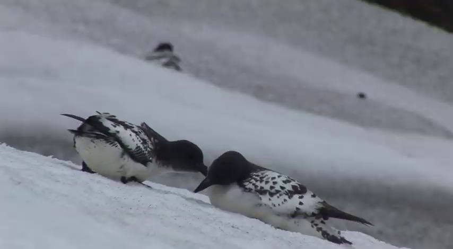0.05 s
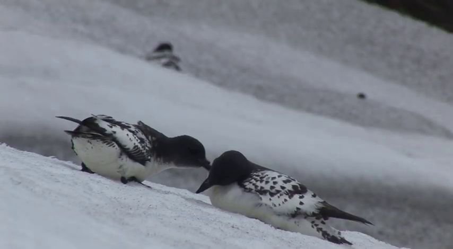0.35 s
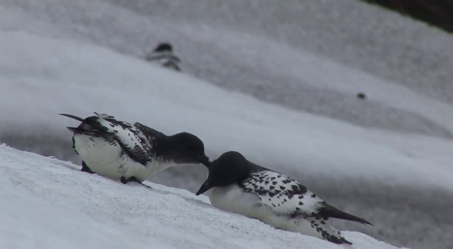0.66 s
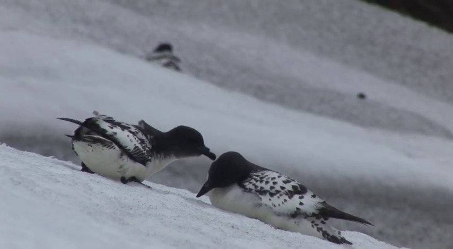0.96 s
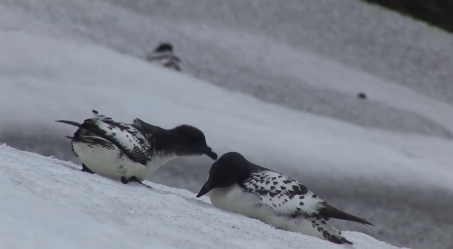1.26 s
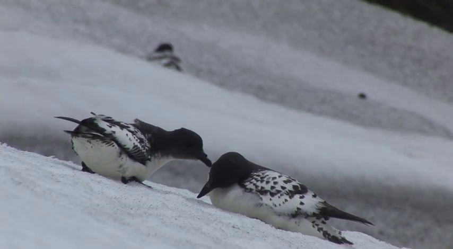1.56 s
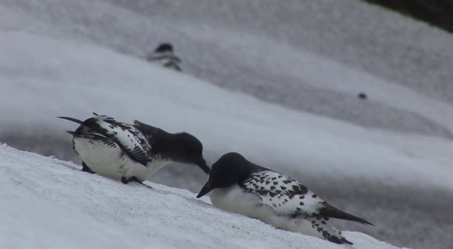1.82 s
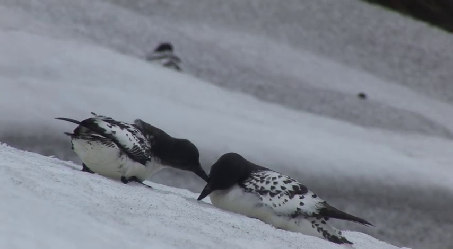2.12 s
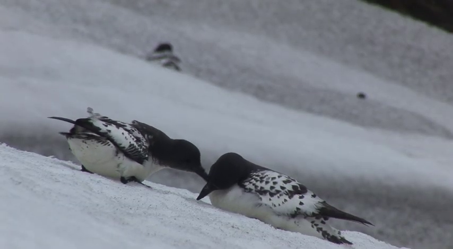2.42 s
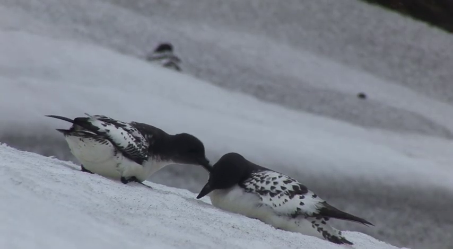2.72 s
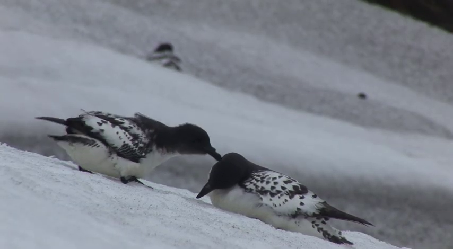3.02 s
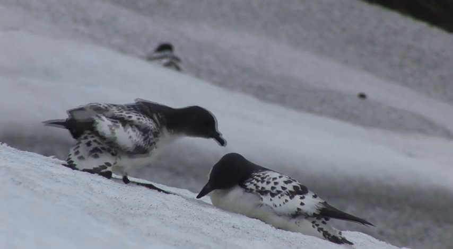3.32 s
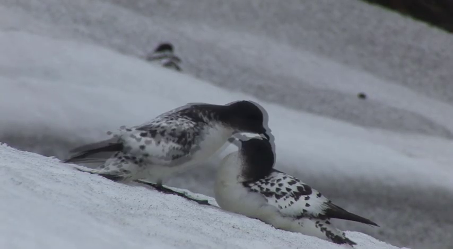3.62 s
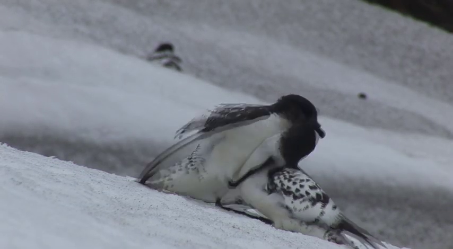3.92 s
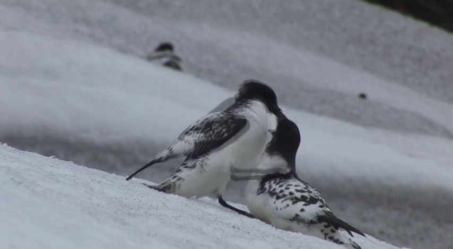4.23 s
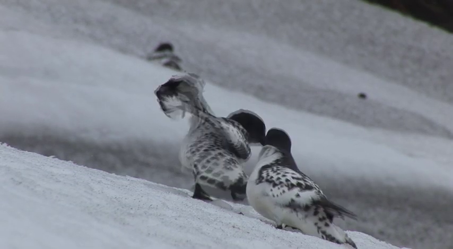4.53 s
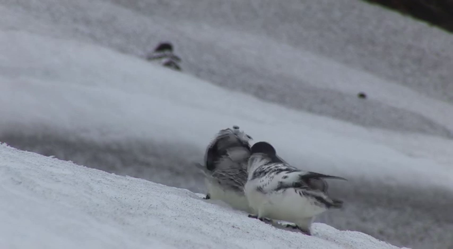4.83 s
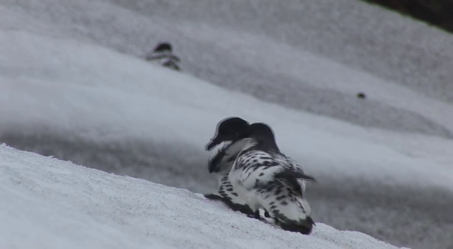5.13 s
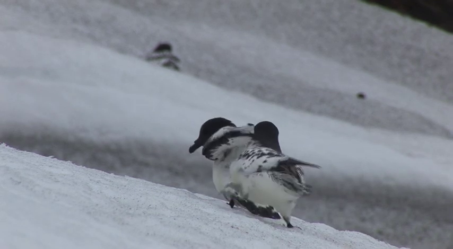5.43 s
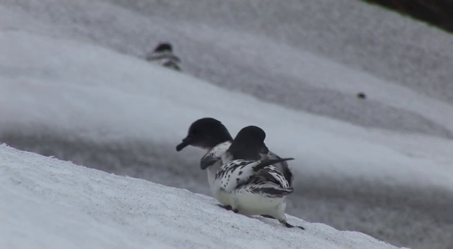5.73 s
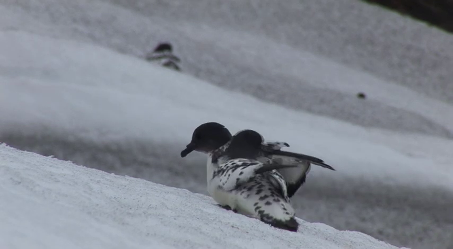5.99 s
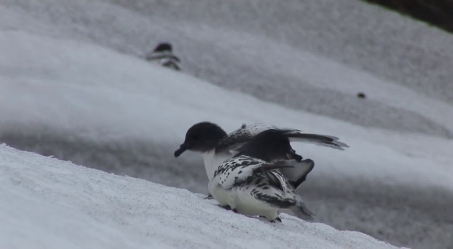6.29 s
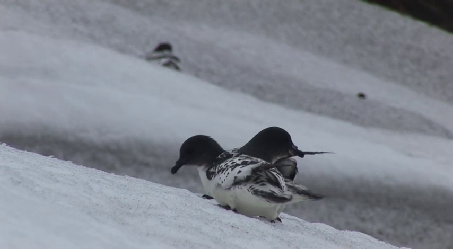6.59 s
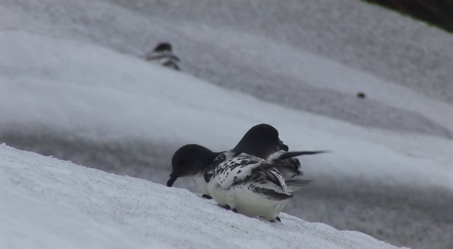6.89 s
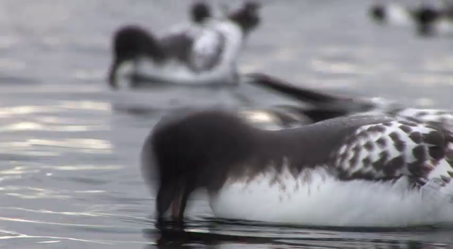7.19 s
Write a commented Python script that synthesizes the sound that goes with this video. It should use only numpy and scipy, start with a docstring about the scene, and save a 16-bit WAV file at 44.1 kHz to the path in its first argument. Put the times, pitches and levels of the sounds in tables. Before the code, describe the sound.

Seabirds quarrel in the open air over a soft wash of shore and faraway birds. Quick, fading pips and dull croaks give way to a nasal cackle, with a few faint ticks. Things quieten briefly before a loud, raspy burst of squeals close to the microphone. Then come hoarse whines, short barks, a dull wing puff, squawks, yelps and another cackle, while low gusts rumble on the microphone.

```python
"""Seabirds squabbling on a snow slope

One bird pips rapidly and slows into a nasal cackle; a close one bursts into shrill squeals, then
whines, barks, squawks and yelps follow. The calls are syrinx pulses and breath shaped by a throat;
the squeals add a whistle. The slope returns a faint echo. Underneath lies the wash of the colony
and the shore, and later on wind buffets the microphone."""
import sys
import numpy as np
from scipy import signal
from scipy.fft import rfft, irfft, next_fast_len
from scipy.io import wavfile
from scipy.ndimage import uniform_filter1d, minimum_filter1d, map_coordinates

SR = 44100
rng = np.random.default_rng(int(sys.argv[2]) if len(sys.argv) > 2 else 0)


def log_audio(samples):
    """Write samples as a 16-bit WAV file to the path given in sys.argv[1]."""
    # one column per channel
    frames = np.atleast_2d(samples).T
    # limit to full scale, then quantise
    limited = np.clip(frames, -1, 1)
    pcm = np.round(limited * 32767).astype(np.int16)
    wavfile.write(sys.argv[1], SR, pcm)


N = 324135

TOP_HZ = 15800  # band limit
USUAL_HZ = 543.4  # notes above this pitch are pressed harder

# close squeals: (time [s], length [s], whistle [dB], 2nd harmonic [dB], 3rd harmonic [dB],
# buzz pitch [Hz], buzz [dB], handover from buzz to whistle [share of the note])
SQUEALS = [(3.997, 0.015, -28, -40, -25.5, 682, -19.5, 0.7), (4.04, 0.016, -25, -14, -38, 719, -11.5, 0.78),
           (4.084, 0.016, -23.5, -19.5, -41, 736, -13.5, 0.58),
           (4.125, 0.021, -21, -12, -32.5, 615, -17.5, 0.12), (4.171, 0.019, -25, -23, -33, 713, -12, 0.74),
           (4.211, 0.022, -21.5, -13, -27.5, 705, -17, 0.14),
           (4.255, 0.019, -18, -13.5, -28, 712, -24.5, 0.078),
           (4.296, 0.024, -31, -61, -51, 694, -8.5, 0.26),
           (4.337, 0.029, -18.5, -23, -21.5, 706, -21, 0.061),
           (4.382, 0.041, -20, -18.5, -39, 717, -18.5, 0.092)]
# the whistle sinks through the burst: (time [s], pitch [Hz])
WHISTLE_PITCH = [(4.04, 2220), (4.26, 2178), (4.33, 2047)]
# dry rasps: (time [s], length [s], start pitch [Hz], end pitch [Hz], level [dB], beak ring [dB],
# fade-out [share of the note])
RASPS = [(3.938, 0.0304, 454, 610, -16, 15, 0.45), (4.418, 0.053, 760, 607, -14.5, -4, 0.91)]
# short pips: (centre [s], nominal length [s])
PIPS = [(0.0395, 0.016), (0.089, 0.018), (0.134, 0.015), (0.176, 0.0071), (0.231, 0.012), (.277, 0.0068),
        (0.329, 0.006), (0.383, 0.0083), (0.4412, 0.0062), (0.497, 0.0054), (0.553, 0.0028), (.58, 0.0059),
        (0.613, 0.0021), (0.6423, 0.011), (0.673, 0.0022), (0.703, 0.0077), (0.733, 0.0027),
        (0.763, 0.0026), (.79, 0.0043), (0.821, 0.011), (0.852, 0.0034), (0.91, 0.01), (0.936, 0.0025),
        (0.969, 0.0083), (0.995, 0.011), (1.025, 0.0011), (1.055, 0.0074), (1.11, 0.0077), (1.17, 0.013),
        (1.202, 0.0022), (1.23, 0.011), (1.293, 0.012), (1.3537, 0.016), (1.416, 0.016), (1.475, 0.011),
        (1.551, 0.0063), (1.641, 0.0046)]
# one curve per cackle, first note to last: (time [s], pitch [Hz], body [dB], edge [dB])
CACKLE_CURVES = [
    [(1.808, 552, -33, -52.5), (1.994, 520, -33, -50.5), (2.058, 589, -28.5, -36), (2.125, 559, -31.5, -45),
     (2.45, 481, -36, -53.5), (2.59, 465, -42.5, -60)],
    [(6.852, 497, -37.5, -49), (6.914, 489, -46.5, -55), (7.045, 560, -34.5, -45.5),
     (7.167, 508, -36.5, -49.5), (7.231, 602, -28, -36.5), (7.295, 564, -29.5, -44.5)],
]
# dull croaks: (time [s], nominal length [s], pitch [Hz], body [dB])
CROAKS = [(0.297, 0.039, 458, -39), (0.684, 0.013, 570, -37.5), (0.704, 0.039, 450, -39),
          (0.86, 0.018, 527, -37), (0.891, 0.035, 482, -39.5), (1.037, 0.021, 513, -36.5),
          (1.074, 0.029, 495, -33.5), (1.219, 0.031, 500, -38), (1.268, 0.028, 488.4, -34.5),
          (1.41, 0.03, 492, -35), (1.456, 0.041, 479, -34.5), (1.53, 0.023, 608, -38),
          (1.661, 0.038, 521, -33.5), (1.708, 0.0237, 456, -36.5), (1.841, 0.014, 477, -33.5),
          (2.654, 0.036, 595.5, -36), (2.705, 0.037, 465, -40.5), (2.877, 0.023, 523, -41),
          (3.043, 0.021, 488, -46.5), (3.59, 0.0096, 520, -41), (3.772, 0.027, 534, -42),
          (4.558, 0.0234, 613, -40.5)]
# whines: (shrill level at the usual pitch [dB], opening beak ring [Hz], settled ring [Hz],
# ring boost [dB], hoarseness [0-1], glide of (time [s], pitch [Hz]))
WHINES = [(-39, 3600, 2950, 11, 0.34, [(3.528, 469), (3.57, 388), (3.6, 285)]),
          (-37.5, 5400, 3280, 8.7, 0.36, [(4.7, 560), (4.722, 729), (4.742, 721), (4.765, 541),
          (4.805, 377)]), (-42, 4400, 4100, 8.4, 0.97, [(4.893, 478), (4.93, 626), (4.968, 499)]),
          (-41, 4700, 3900, 5.7, 0.87, [(4.988, 469), (5.022, 640), (5.068, 426)]),
          (-40.5, 5800, 4000, 3.7, 0.49, [(5.09, 456), (5.118, 543), (5.17, 394)]),
          (-38, 4200, 2850, 13.6, 0.35, [(5.277, 440), (5.298, 590), (5.313, 610), (5.355, 472)]),
          (-36.5, 3100, 3540, 14, 0.38, [(5.348, 466), (5.367, 528), (5.41, 483), (5.455, 368)]),
          (-41, 2500, 4150, 5.1, 0.13, [(5.66, 345.6), (5.697, 440.5), (5.708, 653), (5.745, 492),
          (5.765, 494), (5.787, 559), (5.815, 465), (5.858, 550)])]
# hard barks: (time [s], length [s], pitch [Hz], level [dB])
BARKS = [(5.879, 0.016, 593, -38), (5.928, 0.025, 708, -30.5), (5.978, 0.021, 656, -33)]
# rough squawks: (time [s], nominal length [s], pitch [Hz], body [dB], edge [dB])
SQUAWKS = [(6.146, 0.026, 501, -42.5, -54.5), (6.211, 0.025, 497, -44, -56.5),
           (6.292, .028, 576, -38, -45.5), (6.343, 0.033, 554, -42.5, -51),
           (6.479, 0.03, 572, -37.5, -43.5), (6.521, 0.021, 590, -47, -47.5),
           (6.595, 0.0297, 550, -38.5, -44), (6.627, 0.023, 600, -43, -50), (6.714, 0.0304, 565, -41, -46)]
# thin yelps: (time [s], length [s], pitch [Hz], beak ring [Hz], level [dB])
YELPS = [(3.321, 0.12, 378.4, 1770, -49.5), (3.56, 0.051, 702, 2010, -46), (3.699, 0.054, 705, 2060, -44),
         (3.825, 0.059, 678, 1920, -42.5), (6.394, 0.071, 744, 4350, -39), (6.763, .06, 743, 4150, -37),
         (6.826, .035, 586, 2950, -39.5), (6.952, 0.026, 585, 2900, -39), (7.082, 0.025, 597, 2980, -40.5)]
# fader curve of a farther bird's chatter: (time [s], level [dB])
CHATTER_LEVELS = [(3.036, -49), (3.36, -49), (3.44, -42), (3.52, -44)]
# wing beats: (centre [s], length [s], level [dB])
WING_BEATS = [(6.065, .07, -23.5)]
# clear ticks, before their trims: (time [s], level [dB], dull part against crisp [dB])
TICKS = [(1.1883, -36.5, 11), (1.2757, -34.5, 3), (1.3184, -35.5, 8), (1.361, -38.5, 10.5), (2.981, -47, 7)]
# gusts on the microphone: (peak time [s], half width [s], level [dB])
GUSTS = [(2.802, 0.49, -49), (3.35, 0.36, -55), (4.617, 0.096, -34), (4.894, 0.049, -29.5),
         (5.146, 0.16, -25), (5.722, 0.31, -32.5), (6.075, 0.053, -28.5), (6.283, 0.24, -30),
         (6.868, 0.15, -28.5)]
# fader curves of the distant wash: (time [s], low band before its boost [dB], high band [dB])
WASH_LEVELS = [(0, -47.5, -51), (2.4, -49.5, -53.5), (3.2, -59, -57), (3.8, -60, -53.5), (4.2, -58, -43.5),
               (5.4, -54, -50), (6.6, -52.5, -50.5), (7.35, -45, -43.5)]

# throat resonances of each call: (frequency [Hz], gain [dB])
BUZZ_THROAT = [(400, -38), (700, -32.5), (1600, -30.5), (2100, -15.5), (2800, 1.5), (3500, -5.5),
               (4100, -14), (5000, -7), (5600, -11), (6400, -21), (7700, -24), (12000, -36), (15500, -56)]
RASP_THROAT = [(400, -37.5), (750, -19), (1600, -22.5), (2100, -10.5), (2850, 0.5), (3600, -6.5),
               (4200, -17.5), (5100, -11), (6600, -30), (15500, -48)]
PIP_THROAT = [(700, 9), (1100, 10), (1800, -19), (2500, -16.5), (3700, -20), (4600, -32.5), (5600, -29.5),
              (10000, -57)]
CACKLE_THROAT = [(300, -15), (560, 0), (1050, 5.5), (1550, -4), (2000, -13.5), (2800, -7), (3600, -24),
                 (5200, -18.5), (6300, -32.5), (7200, -26.5), (12000, -49.5)]
WHINE_THROAT = [(400, -13), (700, -3), (1050, 7), (1550, 3), (2300, -2.5), (3050, 2.5), (3600, -5.5),
                (4300, -3), (4800, -8.5), (5400, -21), (7000, -29), (14000, -36)]
BARK_THROAT = [(500, -7.5), (1350, 0), (2300, -15.5), (2900, -1), (4500, -6.5), (6000, -33), (7500, -21.5),
               (15000, -43)]
SQUAWK_THROAT = [(350, -22), (650, -1), (1200, 9), (1600, 3.5), (2100, -8), (2900, 7.5), (4200, -1.5),
                 (5200, -18), (6000, -4), (8000, -18.5), (9800, -18.5), (15000, -29)]
CHATTER_THROAT = [(900, -12), (1550, 21), (2100, -11), (2800, 11), (3500, -2.5), (4700, -1), (6500, -28)]
# a yelp's throat follows the beak: (frequency [multiple of the beak ring], gain [dB])
YELP_THROAT = [(.2, -19), (.35, -6.5), (.5, -12), (.67, -1.5), (.82, -10.5), (1, 2), (1.2, -14),
               (2.5, -35.5)]
# noise colours of the wind rumble and the two wash bands: (frequency [Hz], gain [dB])
RUMBLE_COLOUR = [(12, -34), (25, -2), (60, 5), (90, 2.5), (170, -2.5), (340, -12), (450, -20.5),
                 (800, -37.5)]
LOW_WASH_COLOUR = [(60, -55), (150, 2), (300, 0.5), (550, 7), (900, 4), (1400, -0.5), (2500, -53),
                   (8000, -68)]
HIGH_WASH_COLOUR = [(600, -19.5), (1000, -2.5), (1400, 2), (2000, -5.5), (2900, -7), (4500, -17),
                    (6500, -24.5), (9000, -30.5), (15000, -33.5)]


def amp(db):
    """Decibels to gain."""
    return 10 ** (np.asarray(db) / 20)


def unit(x):
    """Scale to rms 1."""
    return x / np.sqrt(np.mean(x ** 2) + 1e-20)


def eq_db(points, hz):
    """Read an EQ curve on a log frequency axis."""
    knots_hz, db = np.transpose(points)
    return np.interp(np.log(hz + 1), np.log(knots_hz + 1), db)


def wobble(rate, size):
    """A smooth random curve with rate knots a second."""
    knots = rng.standard_normal(int(size * rate / SR) + 4)
    return map_coordinates(knots, [np.arange(size) * rate / SR])


def filtered(x, response):
    """Shape x with a gain that depends on frequency."""
    size = next_fast_len(len(x) + 8192)
    return irfft(rfft(x, size) * response(np.fft.rfftfreq(size, 1 / SR)), size)[:len(x)]


def lowpass(x, cutoff_hz, order):
    """Roll off the top, 6 dB down at the cutoff."""
    return filtered(x, lambda hz: 1 / (1 + (hz / cutoff_hz) ** order))


def noise(colour, size):
    """Coloured noise of rms 1."""
    return unit(filtered(rng.standard_normal(size), lambda hz: amp(eq_db(colour, hz))))


def add(track, time, sound):
    """Mix a sound into the track at a time in seconds."""
    start = max(round(time * SR), 0)
    part = sound[:max(N - start, 0)]
    track[start:start + len(part)] += part


def span(length):
    """Position within a note, from -1 to 1."""
    return np.linspace(-1, 1, max(int(length * SR), 32))


def swell(pos, rise, fall):
    """Smooth fade in and out over the given shares of a note."""
    opening = np.clip((1 + pos) / 2 / rise, 0, 1) * np.clip((1 - pos) / 2 / fall, 0, 1)
    return np.sin(np.pi / 2 * opening) ** 2


def syrinx(pitch, throat, jitter, breath, smear=0, doubling=0, drift_db=3.5,
           ring_hz=3000, ring_db=0, ring_octaves=0.14):
    """The birds' voice: pulses through a throat and a ringing beak, with a puff of air each cycle."""
    size = len(pitch)
    phase = 2 * np.pi * np.cumsum(pitch * (1 + jitter * wobble(400, size))) / SR
    harmonic = np.arange(1, int(TOP_HZ / pitch.min()) + 1)[:, None]
    hz = harmonic * pitch
    # the throat rings after each pulse, so every harmonic lags; smear spreads the pulse further
    grid = np.fft.rfftfreq(1024, 1 / SR)
    log_gain = np.log(amp(eq_db(throat, grid)))
    lag = -signal.hilbert(np.r_[log_gain, log_gain[-2:0:-1]]).imag[:len(grid)]
    partials = np.sin(harmonic * phase + np.interp(hz, grid, lag) - smear * harmonic ** 2)
    # beak and neck keep moving, so each harmonic drifts in strength
    offset, slope = rng.standard_normal((2, *harmonic.shape))
    drift = drift_db * (offset + slope * np.linspace(-1, 1, size))
    ring = ring_db * np.exp(-(np.log2(hz / ring_hz) / ring_octaves) ** 2)
    gains = amp(eq_db(throat, hz) + drift + ring) * (hz < TOP_HZ)
    tone = unit((gains * partials).sum(0))
    air = unit(noise(throat, size) * (1 + np.cos(phase)))
    # alternating strong and weak pulses put lines halfway between the harmonics
    return unit(tone * (1 + doubling * np.cos(phase / 2)) + breath * air)


def squeals(drop_s=0.0036, lift_s=0.0023, squeak_hz=5200, squeak_s=0.0049):
    """A close burst from two sides of the syrinx: in each note a buzz gives way to a whistle."""
    out, squeak_pos = np.zeros(N), span(squeak_s)
    for time, length, whistle_db, second_db, third_db, buzz_hz, buzz_db, handover in SQUEALS:
        pos = span(length)
        size, t = len(pos), (pos + 1) / 2 * length
        # the whistle drops into the note and lifts out of it
        bend = 1 + 0.65 * np.exp(-(t / drop_s) ** 2) + 0.31 * np.exp((t - length) / lift_s)
        pitch = np.interp(time, *np.transpose(WHISTLE_PITCH)) * bend * (1 + 0.0037 * wobble(500, size))
        phase = 2 * np.pi * np.cumsum(pitch) / SR
        # overtones sound where it holds steady; it rasps where it bends, and the buzz shakes it
        steady = swell(pos, 0.13, 0.35)
        fundamental = amp(whistle_db + 10 * np.log2(bend)) * np.sin(phase)
        overtones = amp(second_db) * np.sin(2 * phase) + amp(third_db) * np.cos(3 * phase)
        whistle = np.sqrt(2) * (fundamental + steady / bend ** 10 * overtones)
        whistle *= 1 + 0.13 * np.sin(2 * np.pi * buzz_hz * t + wobble(560, size))
        rasp = amp(whistle_db - 11) * (1 - steady / 2) * noise(BUZZ_THROAT, size)
        buzz = syrinx(buzz_hz * (1 + 0.0085 * wobble(2 / length, size)), BUZZ_THROAT,
                      jitter=0.015, breath=0.1, smear=0.92, doubling=0.13, drift_db=2)
        add(out, time, swell(pos, handover, 0.18) * (whistle + rasp))
        add(out, time, amp(buzz_db) * swell(pos, 0.12, handover + 0.079) * buzz)
        # a thin squeak escapes as each short, forceful note opens and closes
        if length < 0.04:
            envelope = amp(max(whistle_db, buzz_db - 4) - 7) * swell(squeak_pos, 0.46, 0.25)
            for centre in (time, time + length - squeak_s / 4):
                hz = squeak_hz * (1 + rng.normal(0, 0.026))
                squeak = np.sin(2 * np.pi * hz * np.arange(len(envelope)) / SR)
                add(out, centre - squeak_s / 2, envelope * squeak)
    return out


def rasps():
    """Sharp, dry pulses that slide up into the burst of squeals and down out of it."""
    out = np.zeros(N)
    for time, length, start_hz, end_hz, db, ring_db, fall in RASPS:
        pos = span(length)
        rasp = syrinx(np.linspace(start_hz, end_hz, len(pos)), RASP_THROAT,
                      jitter=0.014, breath=0.53, drift_db=4.5, ring_hz=4600, ring_db=ring_db)
        add(out, time, amp(db) * swell(pos, max(1 - fall, 0.1), fall) * rasp)
    return out


def pips(start_hz=1053, end_hz=753, settle_s=0.43, start_db=-21.5, fade_db_per_s=5,
         usual_s=0.0089, chirp_hz=4600, chirp_s=0.0084):
    """Nearly pure blips that sink and fade as the bird tires; the syrinx opens with a faint chirp."""
    out, chirp_pos = np.zeros(N), span(chirp_s)
    octave_dive = chirp_hz * 2 ** (-(chirp_pos + 1) / 2)
    chirp = swell(chirp_pos, 0.56, 1) * np.sin(2 * np.pi * np.cumsum(octave_dive) / SR)
    for centre, length in PIPS:
        halvings = np.log2(usual_s / length)  # a shorter pip is higher and weaker
        hz = (end_hz + (start_hz - end_hz) * np.exp(-centre / settle_s)) * (1 + 0.057 * halvings)
        db = start_db - fade_db_per_s * centre - halvings
        pos = span(length * 0.73 + 0.00186)
        start = centre - len(pos) / SR / 2
        pitch = hz * (1 + 0.092 * (3 * pos ** 4 - 0.15))  # both ends curl up
        pip = syrinx(pitch, PIP_THROAT, jitter=0.048, breath=0.19, drift_db=0)
        add(out, start, amp(db) * swell(pos, 0.26, 0.39) * pip)
        add(out, start - chirp_s / 2, amp(db - 18.5) * chirp)
    return out - lowpass(out, 480, order=6)


def nasal_notes(rows, throat, jitter, breath, rise, fall, lift=0, split_hz=2000):
    """Arched, wavering notes, split into a low body and a bright edge with a level for each."""
    out = np.zeros(N)
    for time, length, hz, arch, body_db, edge_db, shelf_db in rows:
        pos = span(length * 1.08)
        waver = 0.0296 * wobble(2 / length, len(pos))
        pitch = hz * np.clip(1 + lift * pos - arch * pos ** 2 + waver, 0.5, 2)
        call = syrinx(pitch, throat, jitter, breath)
        body = lowpass(call, split_hz, order=10)
        edge = filtered(call - body, lambda f: amp(np.interp(f, [3000, 6000], [0, shelf_db])))
        blend = amp(body_db) * unit(body) + amp(edge_db) * unit(edge)
        add(out, time + (length - len(pos) / SR) / 2, unit(swell(pos, rise, fall)) * blend)
    return out


def cackles(first_gap_s=0.0615, slowing_s=0.00068, note_s=0.026):
    """Slowing runs of nasal notes that swell and ease off; the harder notes grow shriller."""
    rows = []
    for curve in CACKLE_CURVES:
        times, *controls = np.transpose(curve)
        centre, gap = times[0], first_gap_s
        while centre < times[-1] + gap / 2:
            hz, body_db, edge_db = (np.interp(centre, times, control) for control in controls)
            length = note_s * np.exp(rng.normal(0, 0.078))
            arch = 0.161 * rng.uniform(0.63, 1.45)
            shelf_db = 0.85 * (edge_db - body_db + 11.5)
            rows.append((centre - length / 2, length, hz, arch, body_db, edge_db, shelf_db))
            centre += gap + slowing_s / 2
            gap += slowing_s
    return nasal_notes(rows, CACKLE_THROAT, jitter=0.021, breath=0.25, rise=0.24, fall=0.25, lift=0.03)


def croaks(arch=0.157, usual_edge_db=-18, edge_db_per_octave=18):
    """Single hoarse notes in the cackling voice; higher ones are pressed harder and have more edge."""
    rows = []
    for time, length, hz, body_db in CROAKS:
        edge_db = body_db + usual_edge_db + edge_db_per_octave * np.log2(hz / USUAL_HZ)
        rows.append((time, length, hz, arch, body_db, edge_db, 0))
    return nasal_notes(rows, CACKLE_THROAT, jitter=0.022, breath=0.26, rise=0.2, fall=0.28)


def whines(db_per_octave=29, split_hz=2200, ring_settle_s=0.019, attack_s=0.006, release_s=0.02):
    """Sliding cries that swell as they climb; effort lifts the shrill part faster than the body."""
    out = np.zeros(N)
    for db, first_hz, settled_hz, ring_db, hoarse, glide in WHINES:
        times, hz = np.transpose(glide)
        start, length = times[0], times[-1] - times[0]
        t = np.arange(start, times[-1], 1 / SR) - start
        pitch = uniform_filter1d(np.interp(start + t, times, hz), size=400)
        ring_hz = settled_hz + (first_hz - settled_hz) * np.exp(-t / ring_settle_s)
        crack = 0.035 * np.exp(-12 * t / length)  # the voice cracks as it starts, then clears
        cry = syrinx(pitch, WHINE_THROAT, jitter=0.005 + 0.01 * hoarse + crack, breath=hoarse ** 2,
                     doubling=0.2 * hoarse, drift_db=2.6, ring_hz=ring_hz, ring_db=ring_db)
        body = lowpass(cry, split_hz, order=10)
        shrill_db = db + db_per_octave * np.log2(pitch / USUAL_HZ)
        body_db = -22.5 + 0.46 * shrill_db
        envelope = swell(np.linspace(-1, 1, len(t)), attack_s / length, release_s / length)
        add(out, start, envelope * (amp(shrill_db) * unit(cry - body) + amp(body_db) * unit(body)))
    return out


def barks():
    """Hard, bright barks on a level pitch."""
    out = np.zeros(N)
    for time, length, hz, db in BARKS:
        pos = span(length)
        bark = syrinx(np.full(len(pos), hz), BARK_THROAT, jitter=0.017, breath=0.31, drift_db=3)
        add(out, time, amp(db) * swell(pos, 0.18, 0.34) * bark)
    return out


def squawks(arch=0.162):
    """Short, rough notes of the squabble, drooping in pitch at both ends."""
    rows = [(time, length, hz, arch, body_db, edge_db, 0)
            for time, length, hz, body_db, edge_db in SQUAWKS]
    return nasal_notes(rows, SQUAWK_THROAT, jitter=0.018, breath=0.28, rise=0.25, fall=0.25, lift=0.04)


def yelps(sag_per_s=3.2):
    """Thin arched cries focused on one ring of the beak; the longer the cry, the more its ends sag."""
    out = np.zeros(N)
    for time, length, hz, ring_hz, db in YELPS:
        pos = span(length)
        throat = [(ratio * ring_hz, gain_db) for ratio, gain_db in YELP_THROAT]
        pitch = hz * (1 - min(sag_per_s * length, 0.5) * pos ** 2)
        cry = syrinx(pitch, throat, jitter=0.014, breath=0.17, drift_db=2.5)
        add(out, time, amp(db) * swell(pos, 0.25, 0.27) * cry)
    return out


def chatter(cluck_s=0.0086, gap_s=0.02495, pitch_hz=560):
    """A farther bird's fast, even run of dry clucks, a few pulses each."""
    out, pos = np.zeros(N), span(cluck_s)
    times, db = np.transpose(CHATTER_LEVELS)
    for time in np.arange(times[0], times[-1], gap_s):
        cluck = syrinx(np.full(len(pos), pitch_hz), CHATTER_THROAT, jitter=0.049, breath=0.49)
        add(out, time, amp(np.interp(time, times, db)) * swell(pos, 0.43, 0.31) * cluck)
    return out


def wing_beats():
    """A wing pushes a soft, dull puff of air as the birds scuffle."""
    out = np.zeros(N)
    for centre, length, db in WING_BEATS:
        pos = span(length)
        puff = noise([(60, -6.5), (200, -1), (420, 3), (800, -29), (3000, -69)], len(pos))
        add(out, centre - length / 2, amp(db) * swell(pos, 0.44, 0.72) * puff)
    return out


def ticks(t60_s=0.034, trim_db=-8, dull_trim_db=-3, faint_count=22):
    """Tiny crisp ticks with a duller part below: a few clear, many faint and scattered at random."""
    out, t = np.zeros(N), np.arange(SR // 20) / SR
    faint = [(rng.uniform(0.06, 3.7), rng.normal(-50, 3), 0) for _ in range(faint_count)]
    for time, db, dull_db in TICKS + faint:
        crisp = noise([(3000, -8.5), (6000, -1), (10000, 0.5), (15000, -19)], len(t))
        dull = noise([(1500, -13), (2900, 1), (4800, -4), (7000, -27)], len(t))
        decay = amp(db + trim_db - 60 * t / t60_s)
        add(out, time, decay * (crisp + amp(dull_db + dull_trim_db) * dull))
    return out


def wind(calm_db=-60.5):
    """Gusts swell out of a breeze, tumble over the microphone in lumps and bring a faint hiss."""
    t = np.arange(N) / SR
    gust_power = sum(amp(db) ** 2 * np.exp(-((t - peak) / width) ** 2) for peak, width, db in GUSTS)
    wind_db = 10 * np.log10(amp(calm_db) ** 2 + gust_power)
    rumble = lowpass(noise(RUMBLE_COLOUR, N), 750, order=4)
    hiss = amp(-59 + 0.93 * wind_db) * noise([(1000, -31), (5000, -16), (15000, -7.5)], N)
    lumps = amp(2.8 * wobble(28, N))
    return amp(wind_db) * unit(rumble * lumps) + hiss


def far_colony(count=80, air_hz=2600):
    """Scattered notes of far birds; distance takes the edge off their voices."""
    out = np.zeros(N)
    calls = rng.uniform([-0.5, 0.02, 441.5, 0, -0.5], [N / SR, 0.07, 720, 0.25, 0], (count, 5))
    for time, length, hz, arch, db in calls:
        pos = span(length)
        call = syrinx(hz * (1 - arch * pos ** 2), HIGH_WASH_COLOUR, jitter=0.036, breath=0.24)
        add(out, time, amp(db) * swell(pos, 0.92, 0.95) * call)
    return unit(lowpass(out, air_hz, order=2))


def shore_wash(low_boost_db=3, colony_db=-2.5):
    """The bed: two restless bands of shore noise, with the far colony riding in the upper one."""
    times, *faders = np.transpose(WASH_LEVELS)
    low_db, high_db = (np.interp(np.arange(N) / SR, times, fader) for fader in faders)
    colony = amp(colony_db) * far_colony()
    low = amp(low_db + low_boost_db + 2.7 * wobble(17, N)) * noise(LOW_WASH_COLOUR, N)
    high = amp(high_db + 0.28 * wobble(3.7, N)) * (noise(HIGH_WASH_COLOUR, N) + colony)
    return low + high


def slope_echo(x, t60_s=1.0):
    """Rock and snow scatter the calls into a diffuse, dying tail."""
    _, t, spectrum = signal.stft(rng.standard_normal(SR), SR, nperseg=256)
    tail = signal.istft(spectrum * amp(-60 * t / t60_s), SR, nperseg=256)[1]
    return signal.fftconvolve(x, tail / np.linalg.norm(tail))[:N]


def scene():
    """The mono mix: birds in the open air with a touch of echo, over the wash and the wind."""
    birds = pips() + cackles() + croaks() + squawks() + barks() + yelps()
    birds += squeals() + whines() + chatter() + rasps()
    echo = amp(-30) * slope_echo(birds)
    return (birds + echo + ticks() + wing_beats() + shore_wash() + wind())[None]


def record(dry, threshold=0.64, window_samples=180):
    """A limiter holds the loudest peaks down, and everything above the band limit is cut."""
    needed = np.minimum(1, threshold / (abs(dry) + 1e-9))
    gain = uniform_filter1d(minimum_filter1d(needed, size=window_samples), size=window_samples)
    return np.array([filtered(channel, lambda hz: hz < TOP_HZ) for channel in dry * gain])


dry = scene()
out = record(dry)
log_audio(out)
```